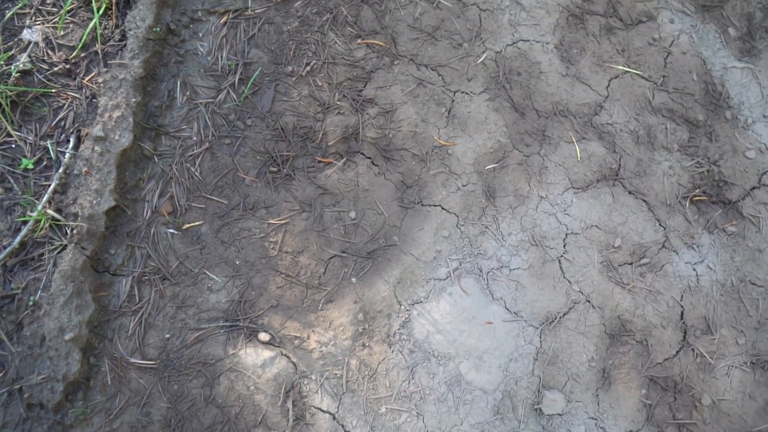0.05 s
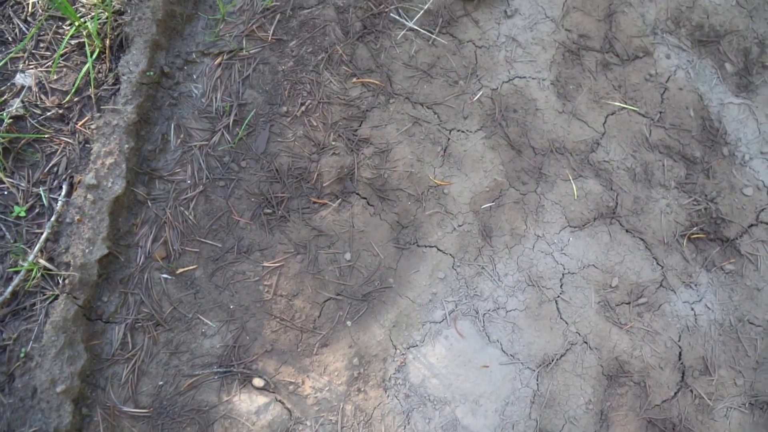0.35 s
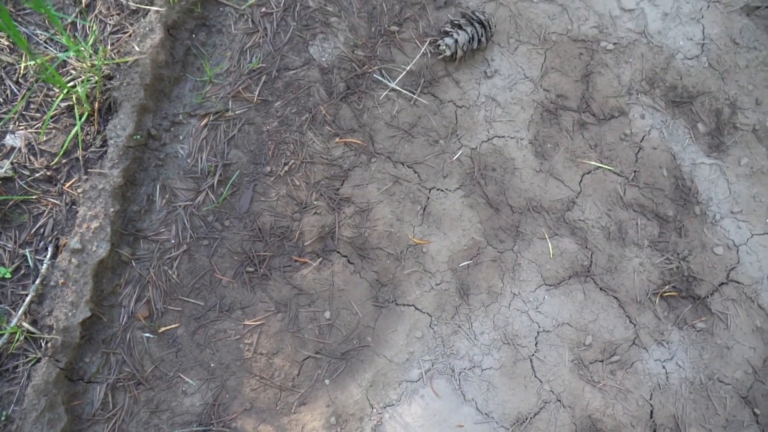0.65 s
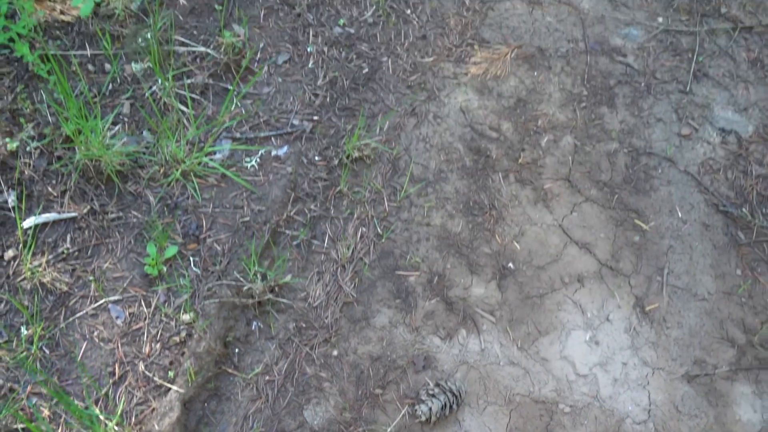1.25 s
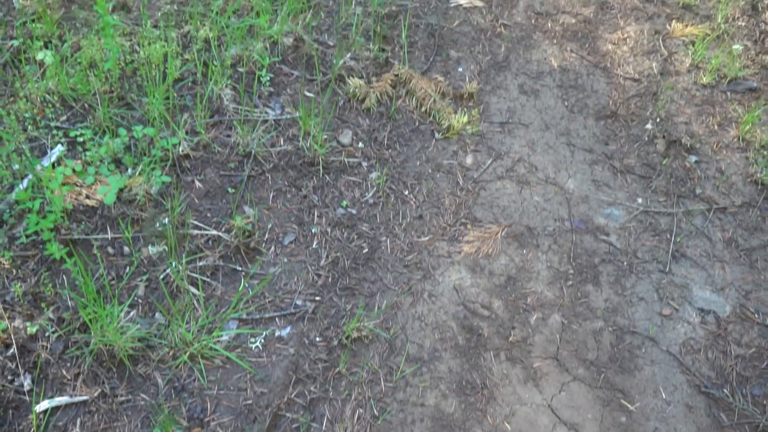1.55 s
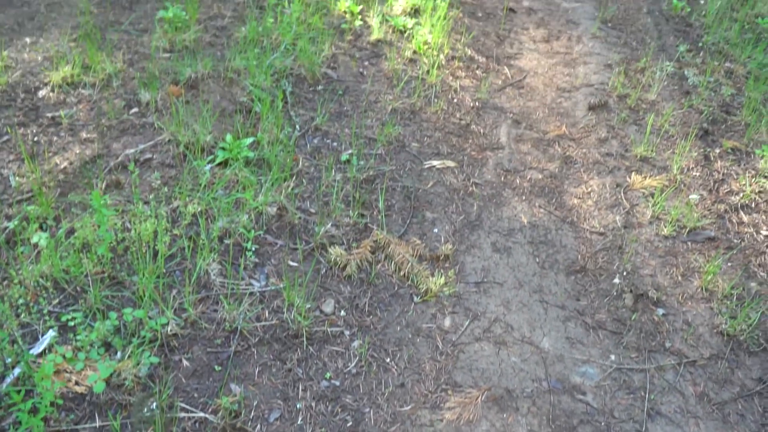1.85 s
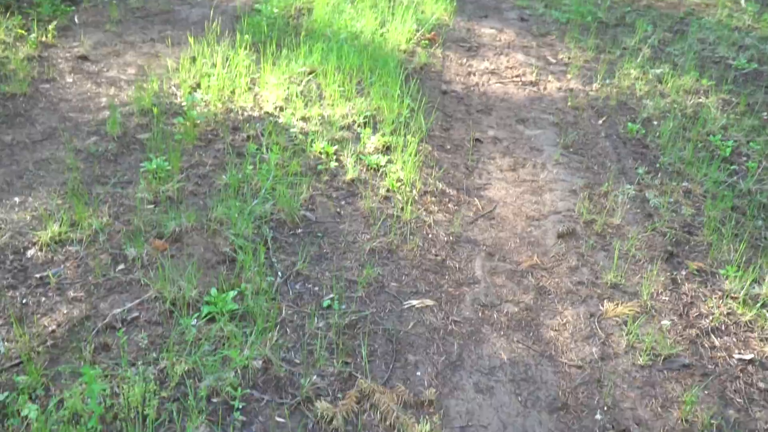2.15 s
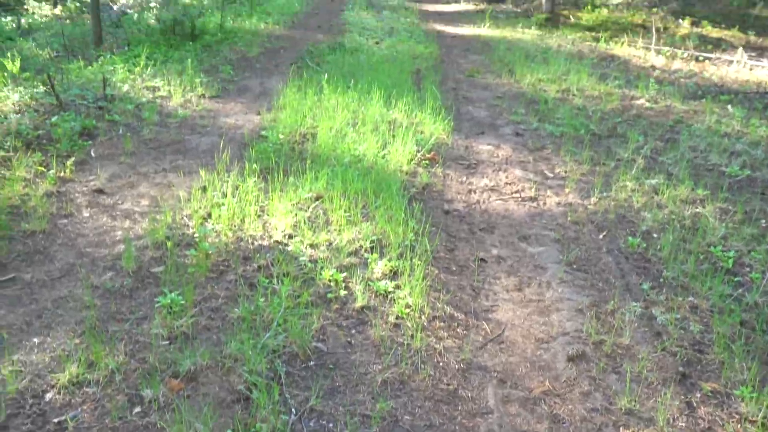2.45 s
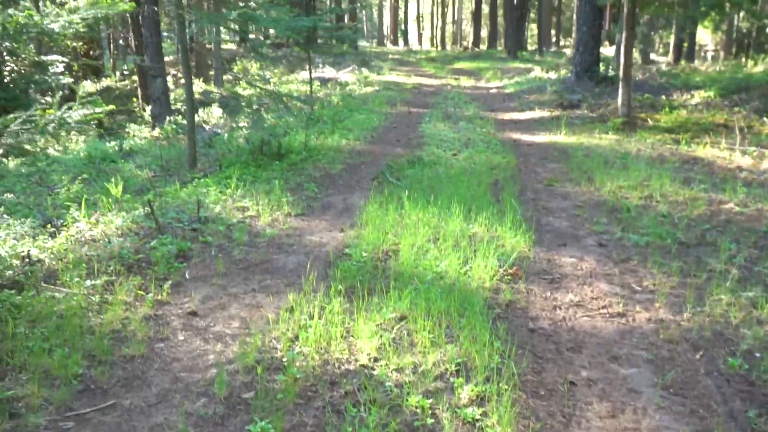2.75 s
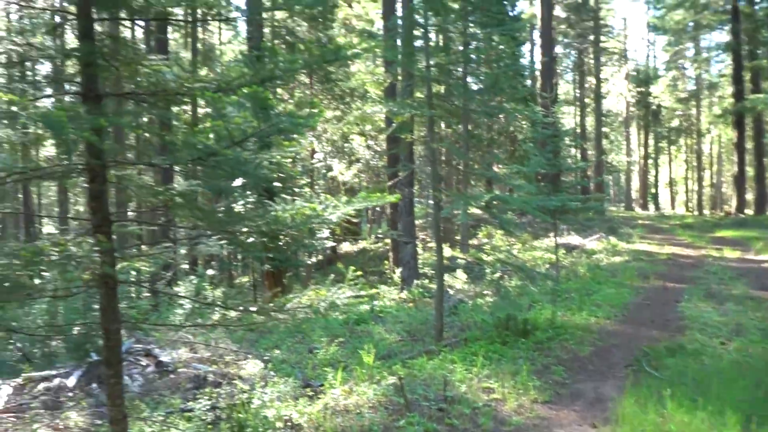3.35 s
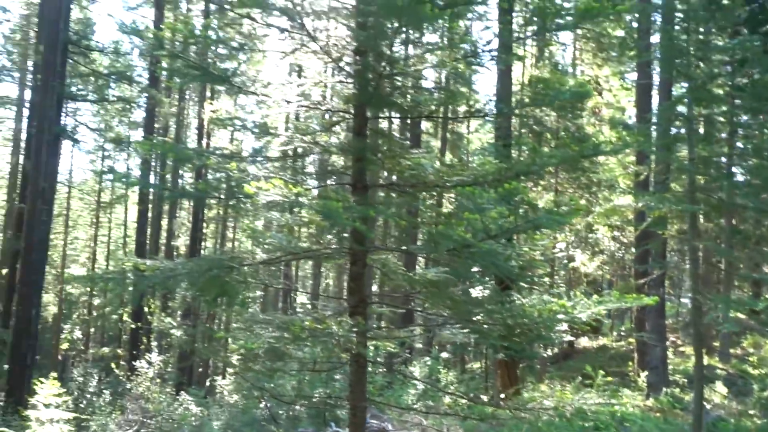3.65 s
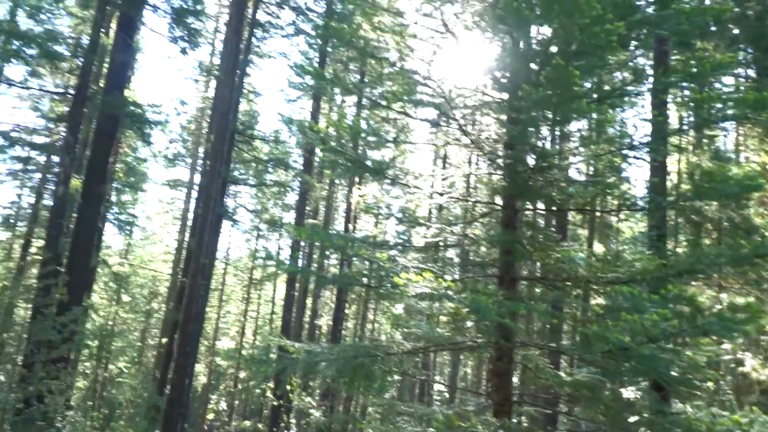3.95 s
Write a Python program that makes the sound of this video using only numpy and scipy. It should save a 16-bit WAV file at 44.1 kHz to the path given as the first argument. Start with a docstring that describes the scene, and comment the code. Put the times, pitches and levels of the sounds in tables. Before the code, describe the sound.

A faint bird whistle opens over quiet forest air, then close handling noise takes over: low thumps, knocks and an uneven rumble on a carried microphone. Far-off birds warble, call and trill, echoing among the trees.

```python
"""A thin, far-off whistle over the soft hush of a conifer forest, heard from a track through the
microphone of a hand-held camera that is carried along and tilted up to the trees. More birds warble,
call and trill in the distance, echoing among the trunks. Right at the microphone, and loudest,
handling jolts the camera body into deep thumps, dull knocks and tiny ticks over an uneven rumble."""
import sys
import numpy as np
from scipy import signal
from scipy.fft import rfft, irfft
from scipy.io import wavfile

SR = 44100
rng = np.random.default_rng(int(sys.argv[2]) if len(sys.argv) > 2 else 0)


def transcribe(u):
    """Save the signal u as a 16-bit wav file named by the first command-line argument.

    u: samples, shape (n,) or (channels, n), limited to [-1, 1]; the rate is SR.
    q: integer samples, one column per channel.
    """
    v = np.clip(np.atleast_2d(u).T, -1, 1)
    q = np.round(v * 32767).astype(np.int16)
    wavfile.write(sys.argv[1], SR, q)


N = 176400
T = np.arange(N) / SR

# spectra of the forest hush, a high hiss and a thin sizzle: (frequency [Hz], level [dB])
AIR_COLOUR = [(20, 9.5), (70, 0.5), (160, 0.5), (300, -5.5), (500, -5), (1000, -6), (2000, -11),
              (3200, -19), (5000, -25.5), (7000, -28), (10000, -33), (15500, -35)]
HISS_COLOUR = [(500, -33), (2000, 1.5), (4200, 5.5), (6200, -1.5), (7200, -17.5), (8800, -18.5),
               (10500, -29), (13200, -22.5), (14500, -32)]
SIZZLE_COLOUR = [(3000, -36.5), (7000, -12), (7900, -2.5), (9200, -7.5), (10200, -17), (12000, -19),
                 (13100, -7), (14200, -27.5)]
# how each of the three swells and fades: (time [s], level [dB])
AIR_LEVEL = [(0, -47), (1, -50.5), (2, -48.5), (2.6, -48), (3.2, -48.5), (4, -48)]
HISS_LEVEL = [(0, -82), (.9, -63.5), (2.1, -69), (2.42, -55.5), (2.65, -54.5), (3.0, -63), (3.6, -59.5),
              (4, -62.5)]
SIZZLE_LEVEL = [(0, -84), (.6, -78), (.9, -70.5), (1.1, -68.5), (1.22, -79), (2.2, -88), (2.42, -66),
                (2.65, -69.5), (2.95, -88), (4, -86)]

# the opening whistle: (level [dB], start pitch [Hz], middle pitch [Hz], end pitch [Hz])
WHISTLE = (-49, 2589, 2666.5, 2643)
# its main tone and side tones: (pitch ratio, relative level [dB])
WHISTLE_TONES = [(.8, -19), (1, -2), (1.2, -13.5)]
# slurred notes of a warbling bird, and thin high calls:
# (time [s], length [s], level [dB], start pitch [Hz], middle pitch [Hz], end pitch [Hz])
WARBLE_NOTES = [(0.974, 0.053, -54.5, 3640, 4340, 4110), (1.002, 0.059, -47, 4300, 3106, 2360),
                (1.08, 0.06, -44.5, 2965, 2900, 3110), (1.144, 0.043, -48.5, 2970, 3285, 3150),
                (1.399, .05, -46.5, 3370, 2948, 2590), (1.438, .055, -44, 2622, 2906, 3670),
                (1.485, .07, -48.5, 3144, 2420, 2040), (1.564, 0.079, -46, 2360, 2562, 2570)]
HIGH_CALLS = [(0.336, 0.073, -61.5, 6820, 6870, 6800), (.921, 0.0074, -50, 6700, 6400, 5930),
              (1.635, 0.049, -70, 8100, 8040, 8100), (1.995, .05, -62, 6750, 6900, 6660),
              (2.27, .04, -67, 5700, 6150, 6600), (2.355, 0.061, -59, 6800, 7250, 7800),
              (2.446, 0.059, -56, 5150, 5620, 5750), (2.505, 0.036, -58, 5850, 6330, 6560),
              (2.29, .05, -73, 12500, 13100, 13500), (2.37, .13, -73, 13200, 13450, 13300),
              (2.55, 0.092, -72.5, 12800, 13200, 13450), (2.68, .13, -74, 12850, 12700, 12900),
              (3.697, 0.033, -58, 5000, 5540, 7000), (3.745, .14, -67, 6350, 6240, 6280),
              (3.89, 0.12, -60, 6400, 6120, 6330), (3.895, .13, -53.5, 4147, 4080, 4010)]
# rising syllables of a trill: (time [s], level [dB])
TRILL_SYLLABLES = [(2.639, -53.5), (2.716, -49.5), (2.795, -48.5), (2.874, -48), (2.952, -46.5),
                   (3.032, -47), (3.117, -46.5), (3.199, -46), (3.287, -46), (3.369, -45.5), (3.448, -49.5),
                   (3.539, -47.5), (3.625, -49), (3.711, -51.5)]

# spectra of the hand moving, creeping and rubbing on the housing: (frequency [Hz], level [dB])
RUMBLE_COLOUR = [(4, 11), (12, -1.5), (28, 7), (45, -2), (65, -12.5), (100, -30), (200, -37), (300, -43),
                 (600, -66), (2000, -101)]
CREEP_COLOUR = [(30, -16), (75, -1.5), (110, -2.5), (165, -1.5), (230, -6.5), (320, -16.5), (700, -41),
                (2000, -84)]
RUB_COLOUR = [(100, -20), (400, 10), (900, 2), (1600, 6), (3000, -5), (6000, -14), (16000, -41)]
# how the rumble and the creeping come and go: (time [s], level [dB])
RUMBLE_LEVEL = [(0, -44), (.58, -47), (.68, -34), (.9, -39.5), (1.12, -30.5), (1.25, -36.5), (1.48, -27.5),
                (1.62, -30.5), (1.85, -41.5), (2.05, -34), (2.2, -43), (2.45, -30), (2.8, -37), (3.1, -32),
                (3.3, -25.5), (3.5, -29), (3.66, -11.5), (3.8, -17), (4, -20)]
CREEP_LEVEL = [(0, -57), (.6, -55.5), (.85, -49.5), (.98, -45.5), (1.1, -45), (1.22, -63), (1.4, -48),
               (1.7, -67), (2.2, -64), (3.1, -61), (3.25, -51.5), (3.5, -51.5), (3.7, -45), (4, -72)]
# brief rubs of skin: (time [s], level [dB], length [s])
RUBS = [(.072, -44, .016), (3.545, -39, 0.047), (3.575, -41, 0.0098)]
# dry ticks of the grip: (time [s], level [dB], centre frequency [Hz])
TICKS = [(.752, -51, 9000), (.778, -53, 9000), (0.905, -49.5, 7500), (1.092, -52, 7500), (1.424, -54, 7500),
         (1.459, -46, 7000), (1.708, -47, 4200), (1.796, -47, 4200), (1.917, -46.5, 7500),
         (2.965, -47, 8000), (3.579, -37.5, 6800), (3.599, -37.5, 6600), (3.619, -54, 6800),
         (3.628, -64, 6500), (3.657, -44, 7200), (3.673, -48, 6600), (3.896, -48, 10000)]
# fingers knocking on the housing: (time [s], level [dB], pitch [Hz])
KNOCKS = [(1.076, -39, 120), (1.094, -39, 100), (1.393, -39, 140), (1.709, -30.5, 378), (1.798, -30, 393),
          (1.836, -36, 380), (1.916, -27, 265), (1.929, -32.5, 140), (1.955, -32, 105), (2.282, -30, 256),
          (2.296, -34.5, 220), (2.479, -29, 260), (2.898, -33, 258), (3.026, -16, 154), (3.152, -28.5, 270),
          (3.178, -24, 178), (3.198, -23.5, 200), (3.552, -17.5, 200), (3.558, -12, 171),
          (3.577, -19.5, 190), (3.632, -17.5, 265), (3.748, -24, 148), (3.773, -25.5, 189)]
# deep thumps of the camera body: (time [s], level [dB], pitch [Hz], time to peak [s])
THUMPS = [(1.078, -22, 44.8, 0.026), (1.392, -24.5, 32.6, 0.014), (1.927, -8, 39.8, 0.03),
          (2.294, -9.5, 40.8, 0.026), (2.491, -10, 38.7, 0.024), (2.912, -11.5, 41.1, 0.027),
          (3.017, -28, 76, 0.01), (3.163, -8, 39.8, 0.023), (3.217, -8, 36.1, 0.036),
          (3.336, -10, 40.7, 0.029), (3.427, -15.5, 40.5, 0.012), (3.523, -12, 36.4, 0.015),
          (3.55, 2.5, 28.3, 0.033), (3.677, -9.5, 32.4, 0.043), (3.808, -11, 30, 0.016)]


def amp(db):
    """Decibels to gain."""
    return 10 ** (np.asarray(db) / 20)


def level(points):
    """Gain over time from (time [s], level [dB]) points."""
    return amp(np.interp(T, *np.transpose(points)))


def add(mix, start_s, sound):
    """Mixes a sound in at a time."""
    part = mix[max(round(start_s * SR), 0):][:len(sound)]
    part += sound[:len(part)]


def noise(colour, size=N):
    """Noise of rms 1 with a spectrum of (frequency [Hz], level [dB]) points."""
    hz, db = np.transpose(colour)
    gain = amp(np.interp(np.log(np.fft.rfftfreq(size, 1 / SR) + 1), np.log(hz), db))
    shaped = irfft(rfft(rng.standard_normal(size)) * gain, size)
    return shaped / np.sqrt(np.mean(shaped ** 2) + 1e-20)


def forest_air():
    """The soft hush of air around the track, with passing swells of hiss and sizzle."""
    hush = noise(AIR_COLOUR) * level(AIR_LEVEL)
    hiss = noise(HISS_COLOUR) * level(HISS_LEVEL)
    sizzle = noise(SIZZLE_COLOUR) * level(SIZZLE_LEVEL)
    return hush + hiss + sizzle


def among_trunks(song, direct_db, echo_db, t60_s):
    """A distant song reaches the microphone directly and as a dying scatter of echoes off the trunks."""
    t = T[:SR]
    scatter = rng.standard_normal(SR) * (rng.random(SR) < .05)
    taps = scatter * amp(-60 * t / t60_s) * np.minimum(t / 0.0089, 1)
    echoes = signal.fftconvolve(song, taps / np.linalg.norm(taps))[:N]
    return amp(direct_db) * song + amp(echo_db) * echoes


def note(length_s, db, pitches, flutter=.002, flutter_hz=84, edge=0.12):
    """A bird tone that curves through three pitches and flutters; edge is each fade's share of it."""
    progress = np.linspace(0, 1, int(length_s * SR))
    hz = np.polyval(np.polyfit([0, .5, 1], pitches, 2), progress)
    hz *= 1 + flutter * np.sin(2 * np.pi * (flutter_hz * length_s * progress + rng.random()))
    fade = np.sin(np.pi / 2 * np.minimum(np.minimum(progress, 1 - progress) / edge, 1))
    return amp(db) * fade * np.sin(2 * np.pi * np.cumsum(hz) / SR)


def whistling_bird(length_s=.37):
    """One long, thin whistle with a weaker tone on either side."""
    song = np.zeros(N)
    db, *pitches = WHISTLE
    for ratio, tone_db in WHISTLE_TONES:
        add(song, 0, note(length_s, db + tone_db, ratio * np.array(pitches), flutter=.001, edge=0.097))
    return song


def calling_bird(notes, flutter):
    """Short gliding notes; a deeper pitch flutter makes them warble."""
    song = np.zeros(N)
    for start_s, length_s, db, *pitches in notes:
        add(song, start_s, note(length_s, db, pitches, flutter))
    return song


def trilling_bird(pitch_spread=0.0074):
    """Each syllable rises, lingers at the top and ends in a quick downward flick."""
    song = np.zeros(N)
    rise_hz, top_hz, flick_hz = np.array([(3638, 4420, 4740), (4670, 4680, 4700), (5910, 4900, 4510)])
    for start_s, db in TRILL_SYLLABLES:
        tune = 1 + pitch_spread * rng.standard_normal()
        add(song, start_s, note(0.03, db, rise_hz * tune, edge=0.24))
        add(song, start_s + .026, note(.04, db - 9.5, top_hz * tune))
        add(song, start_s + .058, note(.02, db - 9.5, flick_hz))
    return song


def distant_birds():
    """Four voices off in the trees, each at its own distance from the microphone."""
    warble = calling_bird(WARBLE_NOTES, flutter=0.039)
    high_calls = calling_bird(HIGH_CALLS, flutter=0.0052)
    return (among_trunks(whistling_bird(), direct_db=0, echo_db=-14, t60_s=2.5)
            + among_trunks(warble, direct_db=-3, echo_db=-1.1, t60_s=1.5)
            + among_trunks(high_calls, direct_db=-1, echo_db=-6.5, t60_s=1)
            + among_trunks(trilling_bird(), direct_db=-1.4, echo_db=-3, t60_s=0.95))


def hand_rumble():
    """The carrying hand rumbles unevenly and creeps softly on the housing."""
    return noise(RUMBLE_COLOUR) * level(RUMBLE_LEVEL) + noise(CREEP_COLOUR) * level(CREEP_LEVEL)


def grip(tick_rise_s=0.00035, tick_decay_s=0.0011):
    """Dry ticks and short rubs of skin under the hand, close by the microphone."""
    out, t = np.zeros(N), T[:2048]
    snap = np.exp(-t / tick_decay_s) * (1 - np.exp(-t / tick_rise_s))
    for start_s, db, hz in TICKS:
        colour = [(hz / 8, -24), (hz / 2 ** .4, -14), (hz, 0),
                  (hz * 2 ** .4, -8), (hz * 1.7, -12), (hz * 1.9, -28)]
        add(out, start_s, amp(db) * snap * noise(colour, size=len(t)))
    for start_s, db, length_s in RUBS:
        stroke = np.hanning(int(length_s * SR))
        add(out, start_s, amp(db) * stroke * noise(RUB_COLOUR, size=len(stroke)))
    return out


def finger_knocks(peak_cycles=0.47, muffle_hz=269, leak_db=-10):
    """A finger gives the damped housing one or two quick swings; it passes little of their treble."""
    swings, t = np.zeros(N), T[:SR // 10]
    for start_s, db, hz in KNOCKS:
        age = t * hz / peak_cycles
        swell = (age * np.exp(1 - age)) ** 1.03
        add(swings, start_s, amp(db) * swell * np.sin(2 * np.pi * hz * t))
    dull = signal.sosfiltfilt(signal.butter(6, muffle_hz, fs=SR, output="sos"), swings)
    return dull + amp(leak_db) * (swings - dull)


def body_thumps(sag=0.067, sag_s=0.025):
    """Each jolt of the camera swells into a few deep swings that sag in pitch, under a faint shudder."""
    out, t = np.zeros(N), T[:SR // 3]
    shudder_colour = [(30, -20.5), (75, 12.5), (130, -11.5), (240, -12), (400, -36), (2000, -60)]
    for start_s, db, hz, peak_s in THUMPS:
        swell = (t / peak_s * np.exp(1 - t / peak_s)) ** 1.79
        pitch = hz * (1 + sag * (np.exp(-t / sag_s) - .5))
        swing = -np.sin(2 * np.pi * np.cumsum(pitch) / SR)
        shudder = amp(-23.5) * noise(shudder_colour, size=len(t))
        add(out, start_s, amp(db) * swell * (swing + shudder))
    return out


def scene():
    """Close handling noise and the distant forest meet at the one microphone."""
    handling = body_thumps() + finger_knocks() + grip() + hand_rumble()
    return (forest_air() + distant_birds() + handling)[None]


def record(dry, cutoff_hz=15800):
    """The biggest thump overloads the recorder, which also cuts off the highest treble."""
    overloaded = dry / (1 + dry ** 16) ** (1 / 16)
    lowpass = signal.firwin(511, cutoff_hz, window=("kaiser", 9), fs=SR)
    return signal.oaconvolve(overloaded, lowpass[None], "same")


dry = scene()
out = record(dry)
transcribe(out)
```